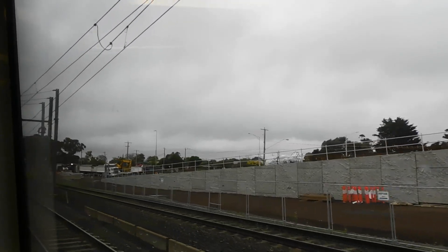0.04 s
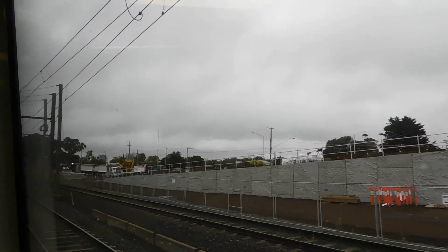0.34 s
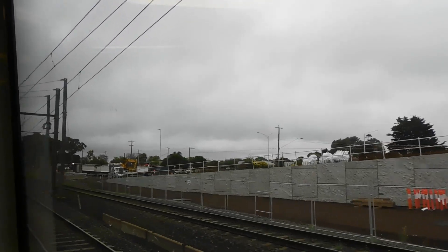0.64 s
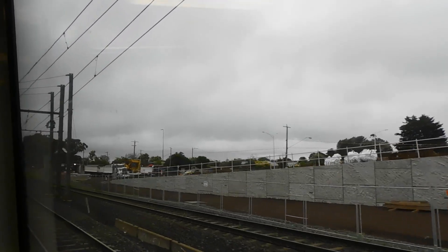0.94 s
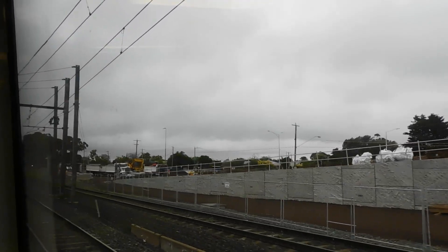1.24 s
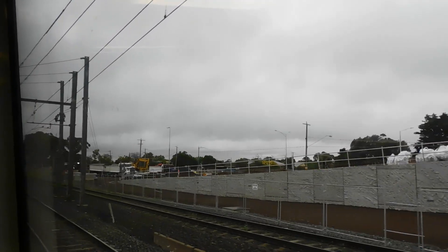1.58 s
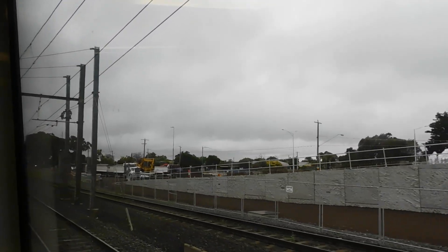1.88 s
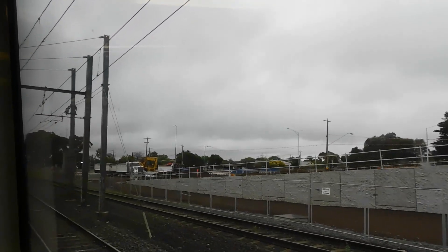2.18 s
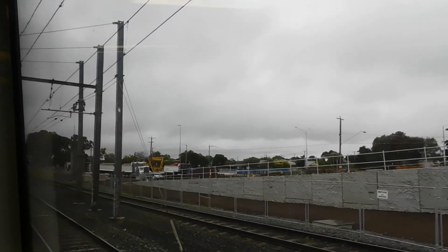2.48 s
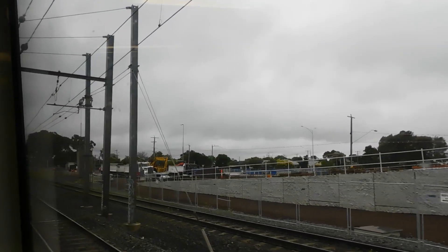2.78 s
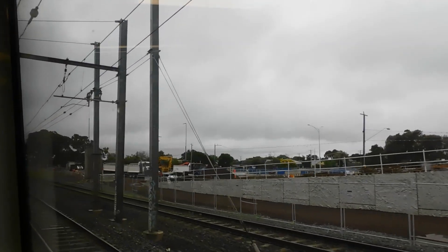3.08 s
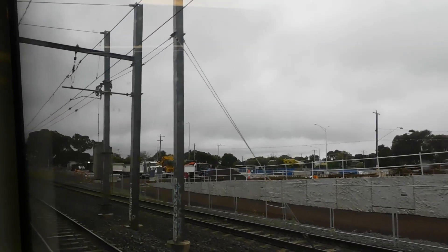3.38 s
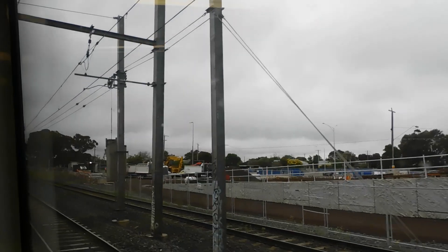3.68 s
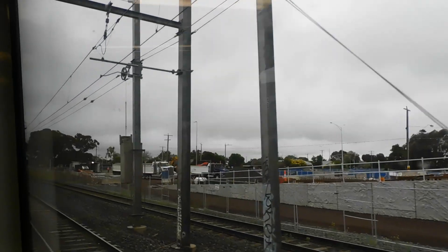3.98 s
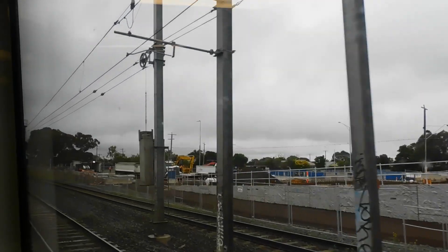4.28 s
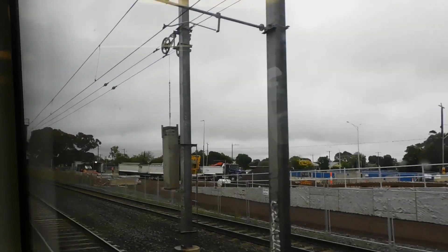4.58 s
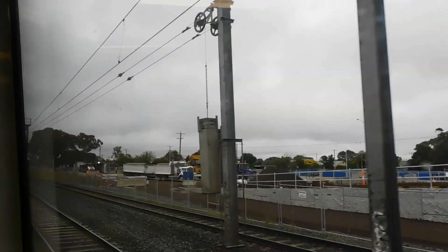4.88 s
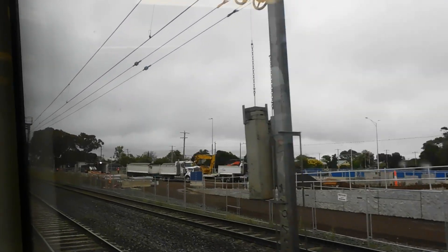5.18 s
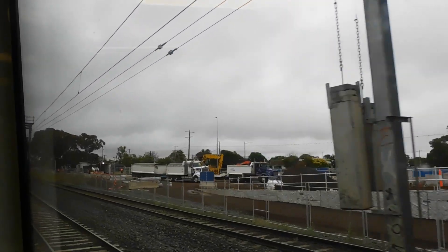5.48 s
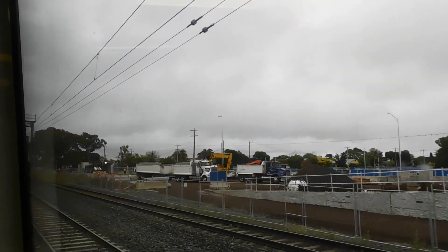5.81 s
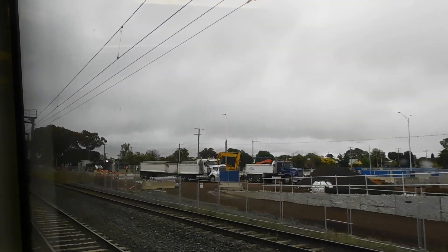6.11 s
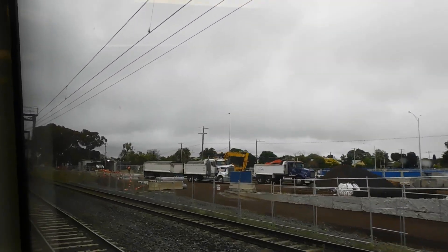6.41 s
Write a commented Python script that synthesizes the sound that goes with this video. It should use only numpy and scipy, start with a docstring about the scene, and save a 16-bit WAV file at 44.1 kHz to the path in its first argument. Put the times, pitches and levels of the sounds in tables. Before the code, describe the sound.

Heard from a window seat inside a moving electric commuter train, the wheels make a steady, muffled low rumble. A low hum and a thin motor whine run through it, with faint vent hiss behind. The whine grows a little stronger. Dull thuds from the rails come through the floor, first sparse, then more often as the bass swells. Near the end a wheel rings briefly over the hardest thud.

```python
"""Train wheels rumble through the floor of an electric commuter carriage, heard from a window seat.
Rail roughness shakes the body, and the bass swells as the track gets rougher. Vents hiss and faintly
whistle, the motor's rotor slots whine, and a blower and the electrical gear hum underneath.
Rough spots in the rail thud in the floor, more often toward the end; at the hardest, a wheel sings."""
import sys
import numpy as np
from scipy import signal
from scipy.fft import rfft, irfft
from scipy.io import wavfile
from scipy.ndimage import uniform_filter1d

SR = 44100
rng = np.random.default_rng(int(sys.argv[2]) if len(sys.argv) > 2 else 0)


def dump_mix(stems):
    """Bounce the given channels to the path in sys.argv[1] as a 16-bit WAV at rate SR."""
    frames = np.atleast_2d(stems).T  # one column per channel
    limited = np.clip(frames, -1, 1)  # hard clip at full scale
    pcm = np.round(limited * 32767).astype(np.int16)
    wavfile.write(sys.argv[1], SR, pcm)


N = 293265
T = np.arange(N) / SR
BIN_HZ = np.fft.rfftfreq(2048, 1 / SR)
FRAME_S = np.arange(N // 512 + 5) * 512 / SR


def amp(db):
    """Decibels to gain."""
    return 10 ** (np.asarray(db) / 20)


def unit_rms(x):
    """Scales a signal to rms 1."""
    return x / np.sqrt(np.mean(x ** 2) + 1e-20)


def over_pitch(points):
    """Draws a curve across the spectrum on a log-frequency axis."""
    hz, value = np.transpose(points)
    return np.interp(np.log(BIN_HZ + 1), np.log(hz + 1), value)


def over_time(rows, t=T, column=1):
    """Draws one column of a table as a curve in time."""
    rows = np.array(rows)
    return np.interp(t, rows[:, 0], rows[:, column])


def pan(lean_db):
    """Stereo gains for a left minus right level difference."""
    lean_db = np.atleast_1d(lean_db)
    return amp(np.array([lean_db, -lean_db]) / 2)


def drift(rate_hz):
    """Smooth random modulation of rms 1, rolled off above the rate."""
    hz = np.fft.rfftfreq(N, 1 / SR)
    return unit_rms(irfft(rfft(rng.standard_normal(N)) * np.exp(-(hz / rate_hz) ** 2), N))


def tone(hz, sway, sway_hz):
    """A sine of rms 1 whose level and phase sway at random."""
    turns = np.cumsum(hz * np.ones(N)) / SR + rng.random()
    wobble = 1 + sway * (drift(sway_hz) + 1j * drift(sway_hz))
    return unit_rms((wobble * np.exp(2j * np.pi * turns)).real)


# how alike the two ears hear the cabin: (frequency [Hz], correlation [0 to 1])
CABIN_CORRELATION = [(100, 1), (350, 0.99), (700, 0.97), (1200, 0.83), (1900, 0.82), (2500, 0.49),
                     (3100, 0.58), (4800, 0.27), (8500, .08), (14000, .23)]
# stereo balance at the seat: (frequency [Hz], left minus right [dB])
CABIN_BALANCE = [(50, -.5), (150, -1), (400, -1.3), (850, -1.5), (1600, -0.5), (2250, -1), (2900, 0.5),
                 (4400, 0)]
def cabin_noise(shape_db):
    """Stereo noise of rms 1, shaped over time and pitch: near mono in the bass, wide in the treble."""
    a, b, c, d = rng.standard_normal((4, len(FRAME_S), len(BIN_HZ)))
    alike = over_pitch(CABIN_CORRELATION)
    left = a + 1j * b
    right = alike * left + np.sqrt(1 - alike ** 2) * (c + 1j * d)
    spectra = np.array([left, right]) * amp(shape_db) * pan(over_pitch(CABIN_BALANCE))[:, None]
    _, noise = signal.istft(spectra.transpose(0, 2, 1), nperseg=2048, noverlap=1536)
    return unit_rms(noise[:, :N])


# shaking from the track as it grows rougher: (time [s], relative level [dB])
TRACK_ROUGHNESS = [(0, -29), (1.4, -29), (2.3, -25), (3.4, -29), (4.9, -26.5), (5.5, -21.5), (5.97, -27),
                   (6.2, -23), (6.65, -24)]
# how strongly each band follows the shaking: (frequency [Hz], depth [dB per dB])
SHAKE_DEPTH = [(30, -0.3), (70, 0.97), (150, 1.15), (230, 0), (500, 0.15), (1500, 0.13)]
# wheel noise darkened by the body shell: (frequency [Hz], relative level [dB])
RUMBLE_SPECTRUM = [(12, -22), (35, -3), (55, -6.5), (110, -1.5), (180, -1), (215, 0.2), (305, -3.5),
                   (350, -9), (395, -9), (490, -18), (670, -13), (790, -19), (1400, -33.5), (3000, -54)]
def wheel_rumble(level_db=-23.5, patchy_db=1.0, lumpy_db=1.0, lumps_hz=7.3):
    """Rail roughness shakes the body in uneven lumps; rougher track swells mostly the bass."""
    lumps = np.interp(FRAME_S, T, drift(lumps_hz))
    shake_db = over_time(TRACK_ROUGHNESS, FRAME_S) + lumpy_db * lumps
    swell_db = (shake_db - shake_db.mean())[:, None] * over_pitch(SHAKE_DEPTH)
    # small patches of the spectrum flicker on their own
    patches = rng.standard_normal((len(FRAME_S), len(BIN_HZ)))
    patches = uniform_filter1d(patches, size=8, axis=0)
    patches = unit_rms(uniform_filter1d(patches, size=12, axis=1))
    return amp(level_db) * cabin_noise(over_pitch(RUMBLE_SPECTRUM) + swell_db + patchy_db * patches)


# colour of the vent air: (frequency [Hz], relative level [dB])
HISS_SPECTRUM = [(500, -10), (1700, -3.5), (2200, -5.5), (2700, -7), (4200, -8), (4900, -10.5),
                 (5700, -11.5), (6500, -15.5), (9000, -17.5), (12000, -24.5), (15500, -25)]
def vent_hiss(level_db=-53.5, flutter_db=0.86, flutter_hz=19):
    """Air leaves the vents as a soft bed of hiss with a slight flutter."""
    return amp(level_db + flutter_db * drift(flutter_hz)) * cabin_noise(over_pitch(HISS_SPECTRUM))


# narrow bands in the vent air: (pitch [Hz], width [Hz], level before the swell [dB])
GRILLE_WHISTLES = [(2880, 9.8, -71.5), (3395, 28, -73)]
def vent_whistles(peak_s=2.7, spread_s=1.3, rest_gain=0.6, peak_gain=1.3, sway=3.0):
    """Air in the grilles makes faint fuzzy whistles that swell and fade once."""
    arch = np.exp(-((T - peak_s) / spread_s) ** 2)
    swell = rest_gain + (peak_gain - rest_gain) * arch
    return swell * sum(amp(db) * tone(hz, sway, width) for hz, width, db in GRILLE_WHISTLES)


# the motor slows a little and its whine swells: (time [s], pitch [Hz], level [dB])
MOTOR_WHINE = [(0, 837, -37.5), (1.9, 836, -37.5), (4.2, 834.2, -34), (6.65, 833.2, -33.5)]
# colour of the whine: (harmonic [number], relative level [dB], left minus right [dB])
WHINE_HARMONICS = [(1, -0.1, -2.5), (2, -23, -4), (3, -42, 0)]
# shaft vibration: (order [multiple of shaft speed], level [dB])
SHAFT_THROB = [(1, -36), (2, -47.5), (3, -42), (6, -43), (11, -38), (32, -54.5)]
def motor(slots=33, overtone_db_per_s=-0.5, sway=0.081, overtone_sway=0.19, shaft_sway=0.24):
    """Rotor slots whine at a multiple of the shaft speed; imbalance throbs at its low orders."""
    hz, level_db = over_time(MOTOR_WHINE), over_time(MOTOR_WHINE, column=2)
    (_, first_db, first_lean_db), *upper_rows = WHINE_HARMONICS
    whine = amp(level_db + first_db) * pan(first_lean_db) * tone(hz, sway, sway_hz=17)
    # the whine grows rounder as it swells: its overtones slowly fade
    overtone_db = level_db.mean() + overtone_db_per_s * (T - T.mean())
    overtones = sum(amp(overtone_db + db) * pan(lean_db) * tone(round(k) * hz, overtone_sway, sway_hz=6.6)
                    for k, db, lean_db in upper_rows)
    throb = sum(amp(db) * tone(round(k) * hz / slots, shaft_sway, sway_hz=2.3) for k, db in SHAFT_THROB)
    return whine + overtones + pan(-0.8) * throb


# how loud the steady hum seems amid the rumble: (time [s], level [dB])
HUM_AS_HEARD = [(0, -22.5), (1.1, -25), (1.42, -27.5), (1.7, -26), (4.1, -25), (5.6, -27.5), (6.65, -27)]
def blower(start_hz=194.1, sag_hz_per_s=0.15, octave_db=-41.5):
    """A steady blower hum with a weaker octave, seeming to waver as it mixes with the rumble."""
    hz = start_hz - sag_hz_per_s * T
    hum = amp(over_time(HUM_AS_HEARD)) * tone(hz, sway=0.14, sway_hz=3.9)
    octave = amp(octave_db) * tone(2 * hz, sway=0.47, sway_hz=3.1)
    return pan(-1.0) * hum + pan(-0.5) * octave


# drone of the electrical gear, plus a faint line 60 Hz below the motor whine: (pitch [Hz], level [dB], left
# minus right [dB])
GEAR_HUMS = [(132.3, -39.5, -0.7), (158.7, -36.5, -1.3), (246.7, -42, -2), (299.8, -41.5, -1),
             (722, -63, -3), (774, -53.5, -2.8), (861, -59, -5), (974, -60.5, -5), (1059, -61.5, -4),
             (2964, -74.5, 0), (3700, -87, -2)]
def electrical_gear(sway=0.41, sway_hz=1.9):
    """Converters and pumps hum faintly under the floor; a faint tone also sits 60 Hz below the motor whine."""
    return sum(amp(db) * pan(lean_db) * tone(hz, sway, sway_hz) for hz, db, lean_db in GEAR_HUMS)


# wheels hitting rough spots in the rail: (time [s], level [dB], decay by 60 dB [s])
RAIL_HITS = [(2.258, -23.5, 0.3), (2.804, -21, 0.22), (2.9, -23, .3), (4.35, -25, .2), (4.53, -14.5, 0.1),
             (5.12, -15, 0.18), (5.479, -18, .2), (5.758, -17.5, 0.17), (6.108, -13, 0.24),
             (6.19, -22.5, 0.28), (6.285, -22, 0.2), (6.451, -20, 0.52)]
# floor and bogie resonances: (frequency [Hz], width [Hz], relative level [dB])
FLOOR_MODES = [(75, 31, -16), (126, 28, 0), (165, 50, -20), (218, 67, -4.5)]
def rail_thuds(attack_s=0.0086):
    """Each rough spot gives a short dull shudder in the floor's resonances."""
    f = np.fft.rfftfreq(N, 1 / SR)
    floor = sum(amp(db) / (1 + ((f - hz) / width) ** 2) ** 2 for hz, width, db in FLOOR_MODES)
    shudder = unit_rms(irfft(rfft(rng.standard_normal(N)) * floor, N))
    envelope = np.zeros(N)
    for onset_s, db, decay_s in RAIL_HITS:
        age = np.maximum(T - onset_s, 0)
        attack = np.minimum(age / attack_s, 1)
        fall_db = 60 * np.maximum(age - attack_s, 0) / decay_s
        envelope += attack * amp(db - fall_db)
    return pan(-1.1) * envelope * shudder


# a wheel sings briefly over the hardest thud and its tail: (time [s], level [dB])
RING_ENVELOPE = [(6.08, -69), (6.16, -35.5), (6.3, -34), (6.35, -37), (6.42, -67)]
def wheel_ring(hz=537):
    """One wheel rings with a short, nearly pure note."""
    gate = (T > RING_ENVELOPE[0][0]) & (T < RING_ENVELOPE[-1][0])
    return pan(-0.2) * amp(over_time(RING_ENVELOPE)) * gate * tone(hz, sway=0.15, sway_hz=17)


def scene():
    """The mix at the seat: a bed of rumble, air and machinery, with the thuds and ring on top."""
    bed = wheel_rumble() + vent_hiss() + vent_whistles() + motor() + blower() + electrical_gear()
    return bed + rail_thuds() + wheel_ring()


def record(dry, low_cut_hz=14, high_cut_hz=15750):
    """The microphones shed the subsonic sway; a steep high cut trims the top of the hiss."""
    low_cut = signal.butter(2, low_cut_hz, "highpass", fs=SR, output="sos")
    high_cut = signal.firwin(1023, high_cut_hz, window=("kaiser", 9), fs=SR)
    return signal.oaconvolve(signal.sosfilt(low_cut, dry), high_cut[None], "same")


dry = scene()
out = record(dry)
dump_mix(out)
```